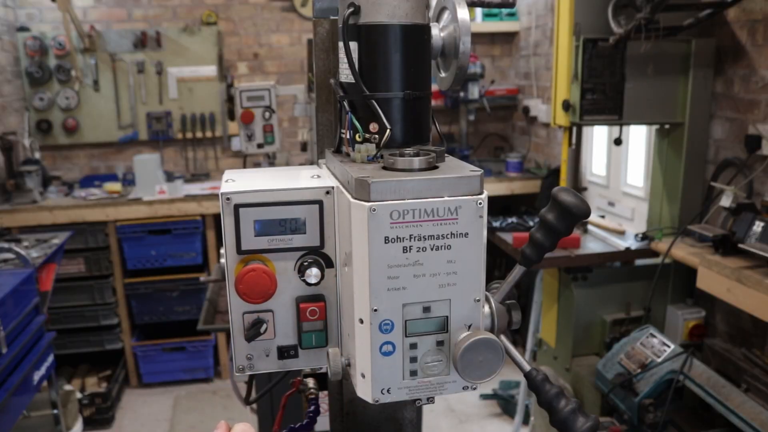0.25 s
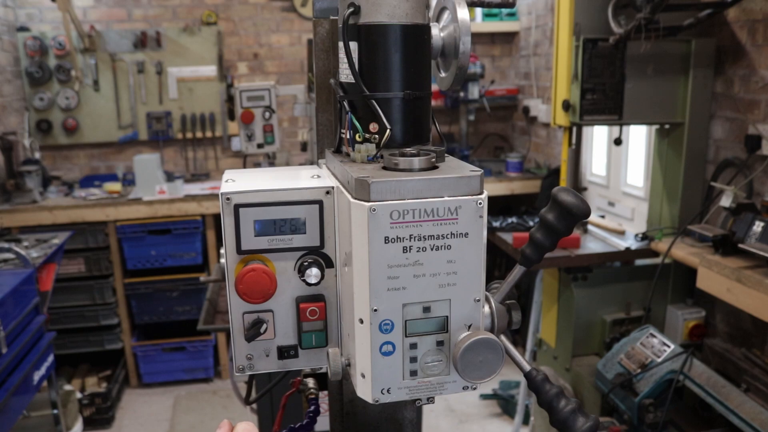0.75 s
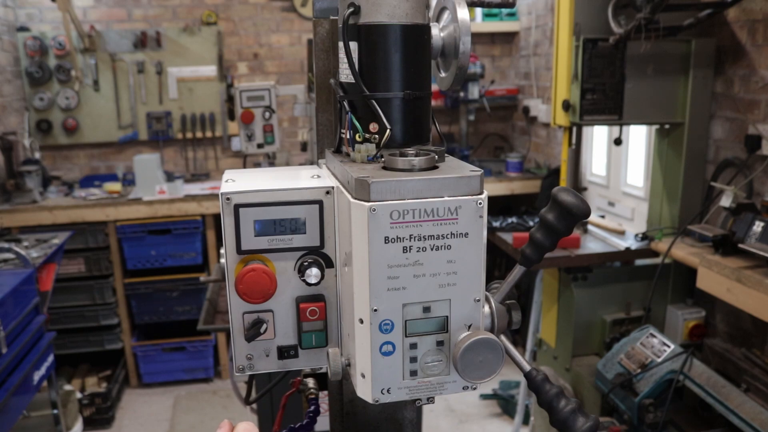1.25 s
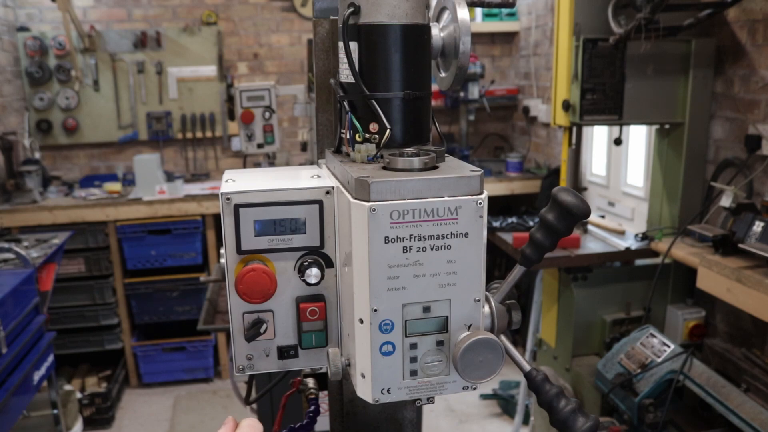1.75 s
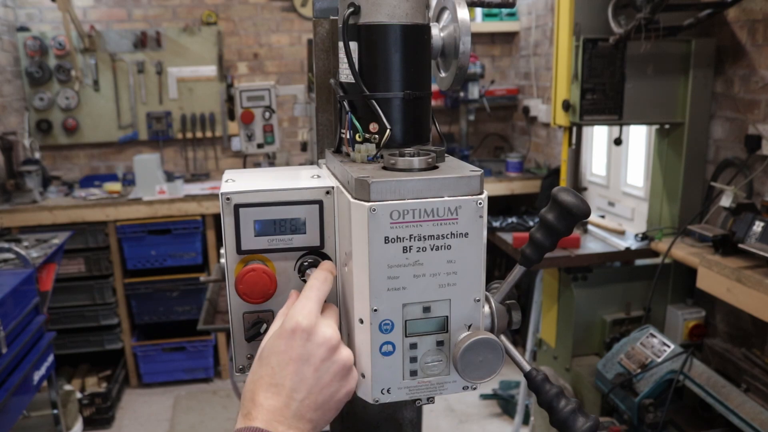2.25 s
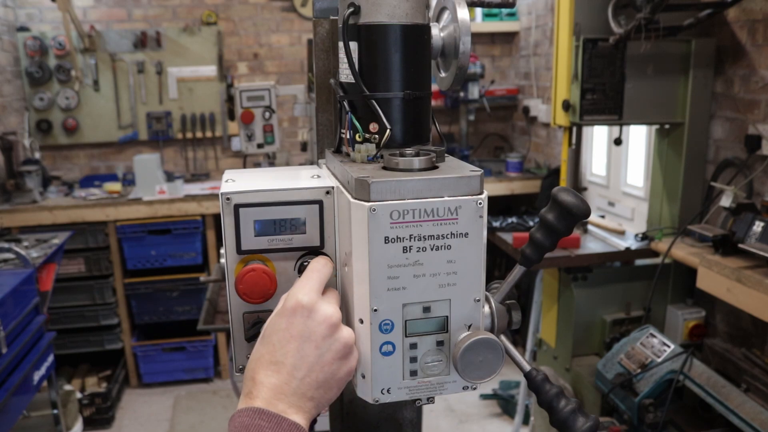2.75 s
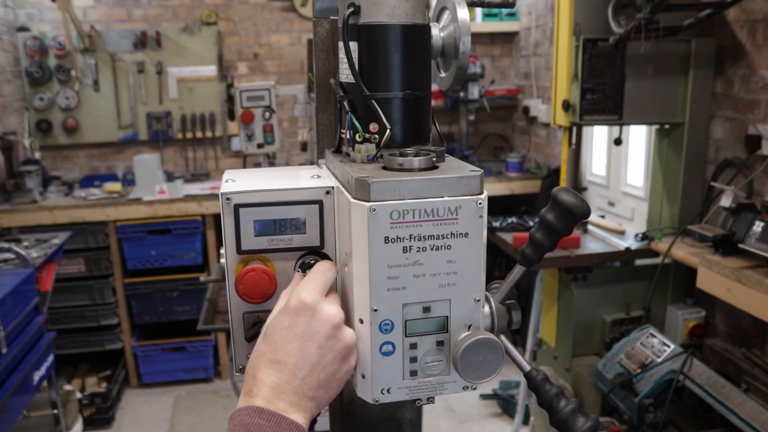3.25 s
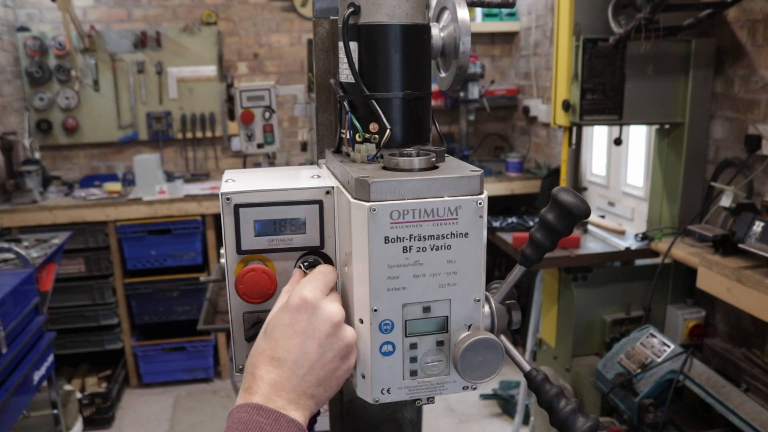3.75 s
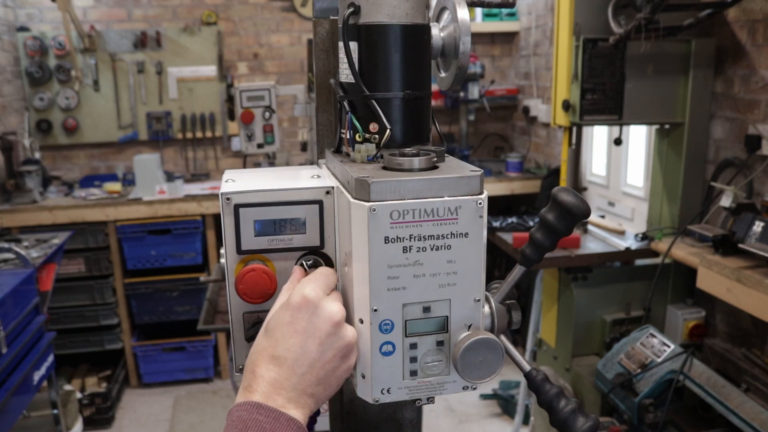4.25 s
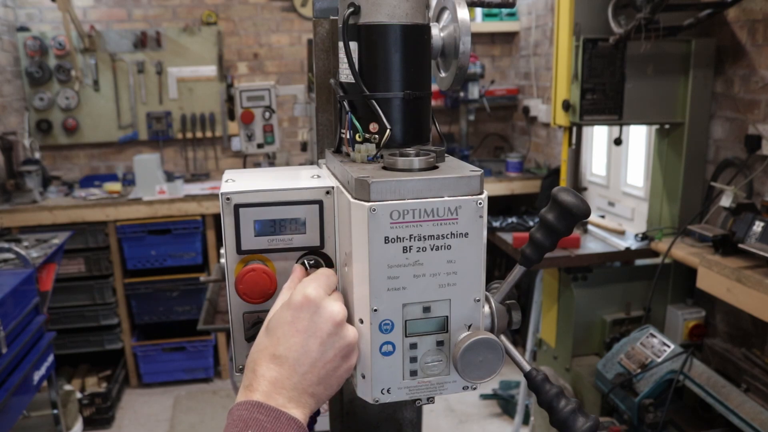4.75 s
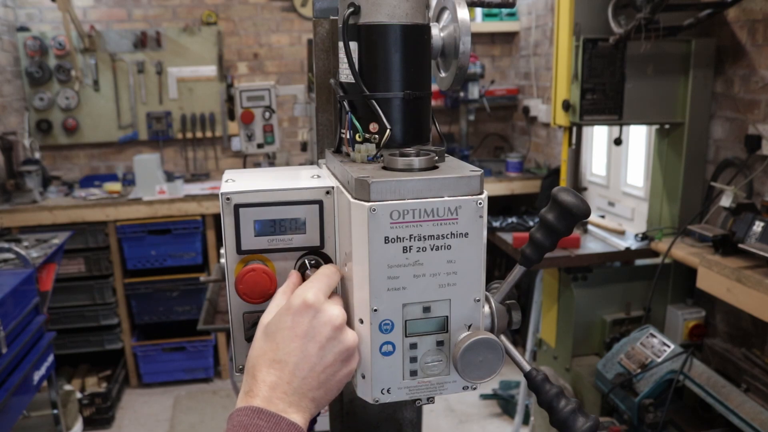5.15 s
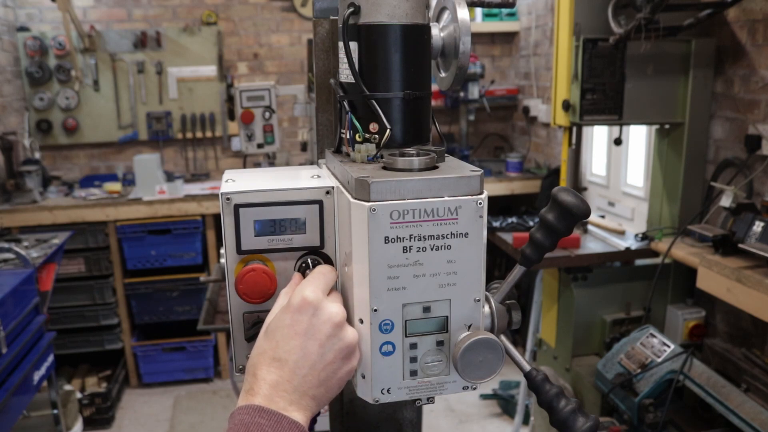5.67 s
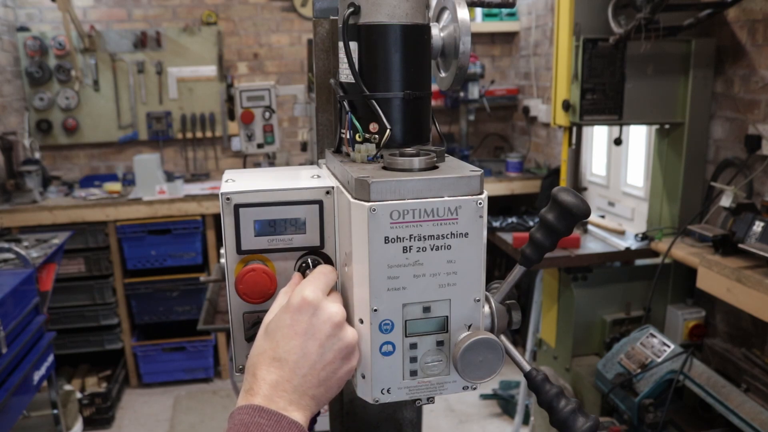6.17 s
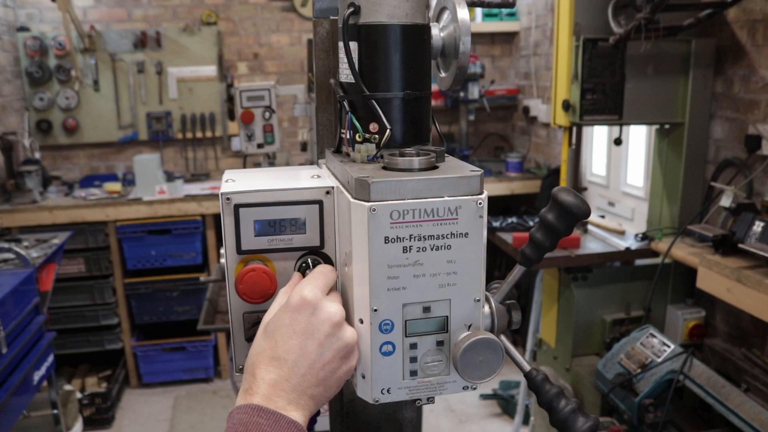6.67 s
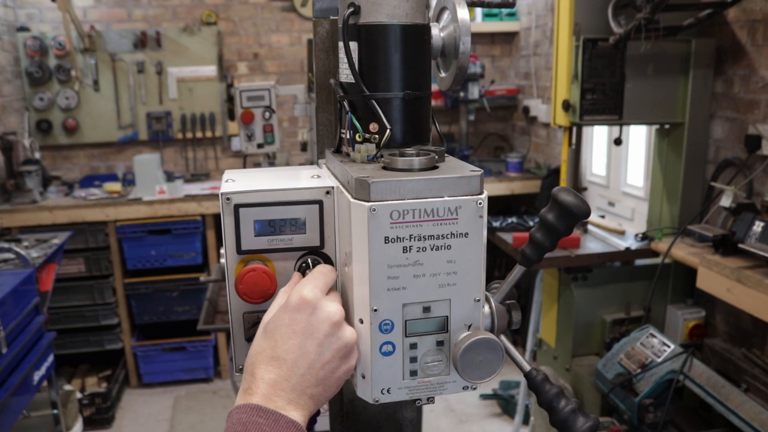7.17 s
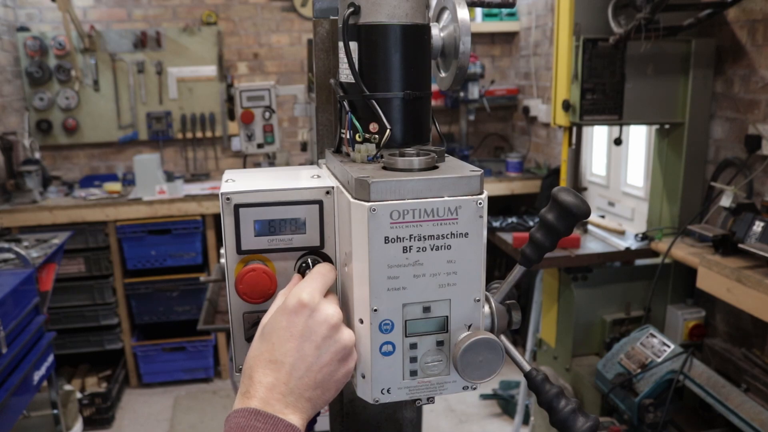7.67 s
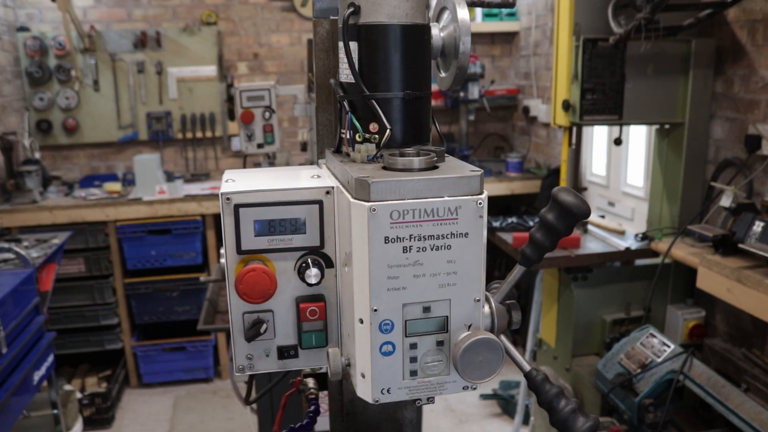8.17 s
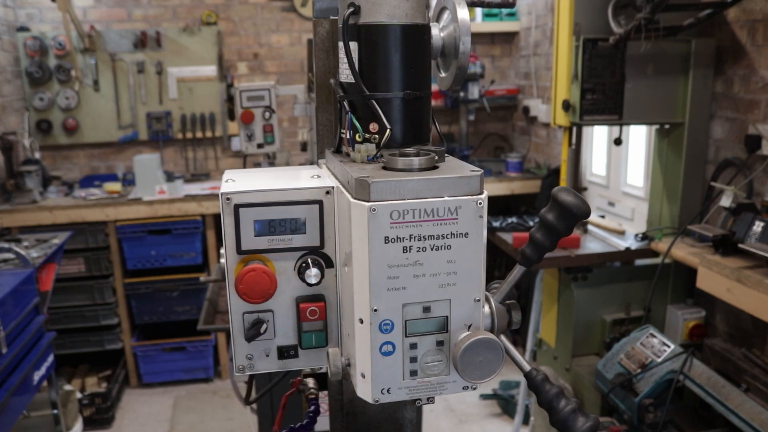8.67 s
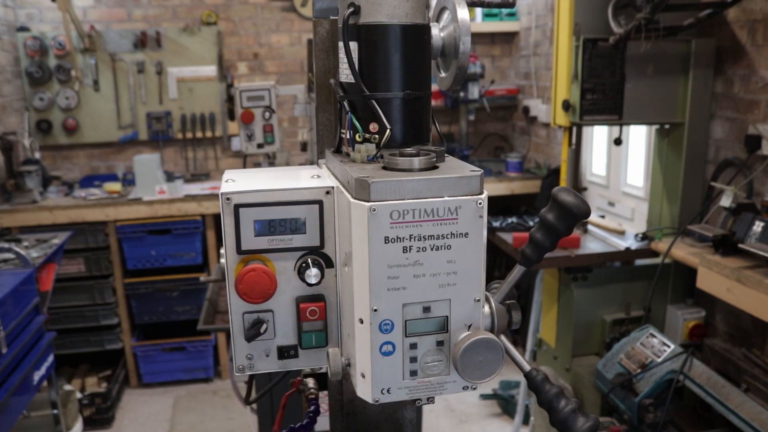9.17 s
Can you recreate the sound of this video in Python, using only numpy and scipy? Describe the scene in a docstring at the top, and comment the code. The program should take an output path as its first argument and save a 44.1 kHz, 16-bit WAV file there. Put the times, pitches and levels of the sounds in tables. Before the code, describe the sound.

A motor-driven gear head turns over slowly, its loose teeth clattering in lumpy, repeating pulses over a soft hum. The speed is raised gradually; the rattle gets much louder, faster and rougher, brushes hiss and buzz at the top, and a modest whine joins in. It settles into a constant harsh run to the end, cut off still running. Close, fairly dry microphone in a cluttered workshop.

```python
"""Loose gear teeth rattle in the cast head of an unloaded bench mill, as random blows that ring the casting.
The mill idles, a hand turns the speed knob up, and it holds at full speed while the teeth also whine.
The blows crowd on the supply ripple, and single knocks and a ringing control box panel stand out;
the hand damps that panel while it rests there. Two brushes tick and scrape over the commutator bars.
Behind them lie the echo of the workshop, wavering hums and a low rumble of filtered noise."""
import sys
import numpy as np
from scipy import signal
from scipy.fft import rfft, irfft
from scipy.io import wavfile
from scipy.ndimage import uniform_filter1d

SR = 44100
rng = np.random.default_rng(int(sys.argv[2]) if len(sys.argv) > 2 else 0)


def to_wav(sig):
    """Store sig (one row per channel, or 1-D mono) as 16-bit WAV at the path in sys.argv[1].

    Samples outside -1..1 are clipped; the rate is SR.
    """
    pcm = np.clip(np.atleast_2d(sig), -1, 1) * 32767
    pcm = np.round(pcm).astype(np.int16)
    wavfile.write(sys.argv[1], SR, pcm.T)  # frames by channels


N = 415422

RIPPLE_HZ = 99.9
FULL_TURNS = 43  # motor turns a second that count as full speed
START_TURN, LAY_RATIO = 0.24, 20 / 37  # motor place at the start in turns; layshaft turns for each motor turn


def amp(db):
    """Turns dB into a plain gain."""
    return 10 ** (np.asarray(db) / 20)


def evened(x):
    """Scales a sound to rms 1."""
    return x / np.sqrt(np.mean(x ** 2) + 1e-20)


def hold_level(x, span=0.2):
    """Holds the slow level near 1, judged over a span in seconds."""
    slow_power = abs(uniform_filter1d(x ** 2, round(span * SR)))
    return x / np.sqrt(slow_power + 1e-3 * np.mean(x ** 2))


def drift(hz):
    """Slow random wandering of rms 1; a higher hz wanders faster."""
    steps = rng.standard_normal(N // 64 + 2)
    step_hz = np.fft.rfftfreq(len(steps), 64 / SR)
    smooth = irfft(rfft(steps) * np.exp(-(step_hz / hz) ** 2), len(steps))
    return np.interp(np.arange(N) / 64, np.arange(len(steps)), evened(smooth))


def colour(x, broad, rings):
    """Filters by a broad spectrum plus resonant bumps, with no sound ahead of a blow; white noise keeps its power."""
    hz = abs(np.fft.fftfreq(8192, 1 / SR))
    points_hz, points_db = np.transpose(broad)
    db = np.interp(np.log(hz + 1), np.log(points_hz), points_db)
    for centre, width, height_db in rings:
        db = db + height_db / (1 + (2 * (hz - centre) / width) ** 2)
    log_gain = np.log(amp(np.maximum(db, -100)))
    # minimum phase: the response starts as promptly as this spectrum allows
    taps = np.fft.ifft(np.exp(log_gain - 1j * signal.hilbert(log_gain).imag)).real[:4096]
    return signal.oaconvolve(x, taps / np.linalg.norm(taps))[:N]


def ticks(places, sizes):
    """Smooth clicks that may fall between two samples, so that their timing is exact."""
    at = np.floor(places)[:, None] + np.arange(-15, 17)
    away = at - places[:, None]
    shape = np.sinc(away) * np.cos(np.pi * away / 34) ** 2
    slots = np.clip(at, 0, N).astype(int)
    return np.bincount(slots.ravel(), (shape * sizes[:, None]).ravel(), N + 1)[:N]


def grown(speed, law):
    """Gain that grows with the speed above a quiet creep."""
    full_db, tenfold_db, creep = law
    return amp(full_db + tenfold_db * np.log10(np.maximum(speed - creep, .3) / (FULL_TURNS - creep)))


# How fast the motor shaft spins.
# Each row: time in seconds, speed in turns a second before rounding off.
MOTOR_SPEED = [(0, 12.44), (0.4, 13.29), (0.8, 11.73), (1.5, 11.01), (2.8, 10.73), (3.43, 10.66),
               (3.85, 14.37), (4.8, 26.84), (5.25, 31.6), (5.7, 34.3), (6.2, 38.9), (6.7, 41.05),
               (7.4, 42.45), (8.1, 42.85), (9.42, 42.9)]


def motor_speed():
    """Speed of the motor shaft; the rotor's inertia rounds off each change."""
    speed = np.interp(np.arange(N) / SR, *np.transpose(MOTOR_SPEED))
    return uniform_filter1d(speed, SR // 5, mode="nearest")


# Uneven places round the layshaft wheel: proud teeth strike harder, low ones softer.
# Each row: place in turns, change of blow strength in dB at idle, the same at full speed, before each spot's weight.
UNEVEN_TEETH = [(0.98, 6, 5), (0.073, 7.5, -1), (0.168, 5.5, 1.5), (0.277, 7.5, 2.5), (0.448, -10.5, 3),
                (0.556, 6, 2.5), (0.755, -1, -1.5), (0.84, -18, 1)]
# Contact spots between the teeth; each favours one region of the head.
# Each row: ring in Hz, ring width in Hz, ring height in dB, spread of blow sizes in dB, share of smooth
# rolling noise (a plain factor), scatter time in seconds, weight of the uneven teeth (a plain factor),
# swell per spindle turn in dB (shrinks with speed), basic blows a second (speed, ripple and uneven teeth
# change it), crowding of blows on the ripple peaks in dB (below zero they thin out there),
# level in dB before the shared gains.
CONTACT_SPOTS = [(584, 120, 16, 2, 0.086, 0.026, 0.57, 13, 24, -0.5, -10.5),
                 (942, 1020, 10.5, 2, 0.56, 0.02, 0.4, 0.4, 300, 1, -0.5),
                 (2553, 1670, 13.5, 2, 0.14, 0.02207, 0.9, -1.8, 280, 4, 0.5),
                 (3700, 1080, 11.5, 1.2, 0.095, 0.02, 0.81, 1.5, 160, 8, -1.5),
                 (4855, 2000, 11, 4.5, 0.032, 0.01496, 0.94, 1.5, 130, 8, -1.5)]
# Broad sound colour of the head casting at idle. Each row: pitch in Hz, relative level in dB.
HEAD_SLOW = [(240, -20), (400, -54), (480, -8.5), (556, -20), (968, 2), (1360, -2), (1650, 3), (2620, 8),
             (2810, 5), (3440, 2), (6000, -11), (7800, -38), (13200, -120)]
# The same at full speed. Each row: pitch in Hz, relative level in dB.
HEAD_FAST = [(240, -34.5), (400, -32.5), (525, -10.5), (629, -16), (808, -13.5), (1340, -10), (2540, 1.5),
             (3150, -2), (3730, -3.5), (5180, -7), (6000, -15), (7800, -20), (13200, -120)]
# Narrow rings of the head. Each row: pitch in Hz, dB over the broad colour, before a small random change.
HEAD_RINGS = [(490, 7.5), (545, 5.5), (790, 8.5), (880, 3.5), (935, 1.5), (1270, 0.5), (1582, 1.5),
              (1690, 9), (1808, 8), (2024, 2.5), (2164, 3), (2304, 4.5), (2503, 7.5), (2571, 2.5),
              (2630, 2), (2700, 5.5), (2820, 9), (2906, 8), (2993, 2), (3445, 3.5), (3692, 6.5),
              (3875, 3.5), (4069, 5), (4382, 6.5), (5254, 6), (5469, 1)]
RING_WIDTH_HZ, RING_WIDENING = 47, 0.34  # width at 2500 Hz; higher rings are wider, as a power of their pitch
RATTLE_LAW = (-22, 17.93, 7.7)  # dB at full speed, dB per tenfold of speed above the creep, creep in turns a second


def gears(turns, speed, pace):
    """Teeth chatter through their backlash; torque ripple and uneven teeth change how hard and often they strike."""
    t = np.arange(N) / SR
    lay = (turns - START_TURN) * LAY_RATIO  # layshaft place in turns
    uneven_db = np.zeros(N)
    for place, idle_db, full_db in UNEVEN_TEETH:
        turns_away = (lay - place + .5) % 1 - .5
        near = np.exp(-(turns_away / (0.018 + 0.032 * pace)) ** 2)
        uneven_db += (idle_db + (full_db - idle_db) * pace) * near
    ripple = np.cos(2 * np.pi * (RIPPLE_HZ * t - .83))
    ripple_db = (0.5 + 0.59 * pace) * ripple
    # the spindle turns once for two layshaft turns
    spindle = (1 - 0.24 * pace) * np.cos(2 * np.pi * (lay / 2 - .62))

    level = grown(speed, RATTLE_LAW)
    fast_share = np.clip(2.6 * pace, 0, 1)  # crossfade from the idle colour to the full-speed colour
    whine = mesh_whine(lay, level * fast_share)
    knock_blows, knock_rings = knocks()
    out = np.zeros(N)
    for k, spot in enumerate(CONTACT_SPOTS):
        hz, width, height_db, spread_db, smooth, scatter_s, weight, swell_db, rate, crowd_db, level_db = spot
        rings = [(f, RING_WIDTH_HZ * (f / 2500) ** RING_WIDENING, db + 0.49 * rng.standard_normal())
                 for f, db in HEAD_RINGS]
        rings.append((hz, width, height_db))
        sizes = amp(spread_db * np.minimum(rng.exponential(1, N), 3))
        crowding = amp(0.7 * weight * uneven_db + crowd_db * (ripple - .4))
        blows_a_second = crowding * rate * (1 + 3.5 * pace ** 3)
        blows = sizes * (rng.random(N) < blows_a_second / SR)
        hard_db = weight * uneven_db + ripple_db + swell_db * spindle + 0.63 * drift(7.4)
        rattle = hold_level(amp(hard_db) * rng.choice([-1., 1.], N) * blows, span=0.19)
        hit = level * (0.52 * rattle + smooth * rng.standard_normal(N))
        if k > 1:  # single knocks reach the three later spots, the third row most
            hit += amp(9.5) * knock_blows * (1.57 if k == 2 else 1)
        hit = amp(level_db) * scattered(hit, scatter_s)
        out += colour(hit * (1 - fast_share), HEAD_SLOW, rings)
        out += colour(hit * fast_share, HEAD_FAST, rings)
    out += whine
    return amp(-2.0) * (out + panel(out)) + knock_rings


def scattered(x, scatter_s):
    """Many paths through the casting spread a blow in time: each pitch has its own delay, uncoloured."""
    delay_s = scatter_s / 12 * np.minimum(rng.exponential(1, 129), 4)
    # summing the delay over pitch gives the phase, in turns
    phase_turns = np.cumsum(np.interp(np.arange(2049) / 16, np.arange(129), delay_s)) * SR / 4096
    return signal.oaconvolve(x, irfft(np.exp(-2j * np.pi * phase_turns))[:1024])[:N]


# Whine of the meshing teeth.
# Each row: cycles per layshaft turn, relative level in dB, growth as a power of the speed (besides the rattle's).
MESH_TONES = [(37, -29, 20), (38, -23, 22), (42, -23, -1), (55, -21, 12)]


def mesh_whine(lay, gain):
    """Meshing teeth push the head at whole multiples of the layshaft turn, and one head ring answers."""
    share = np.gradient(lay) / np.gradient(lay).max()  # share of the top speed
    whine = np.zeros(N)
    for multiple, db, power in MESH_TONES:
        wavering = amp(db + 2 * drift(12))
        whine += share ** power * wavering * np.sin(2 * np.pi * multiple * lay + .4 * drift(20))
    broad = [(400, -30), (560, -4), (690, -9), (850, 0), (2500, -12)]  # Hz, dB
    return amp(-11) * colour(gain * whine, broad, [(885, 110, 8)])  # ring: Hz, width in Hz, dB


# Loudest single knocks.
# Each row: start in seconds, level in dB before the gains of blow and ring, ring pitch in Hz.
LOUD_KNOCKS = [(0.0825, -32, 3500), (0.16, -28, 2620), (0.188, -23, 3600), (0.226, -30, 3570),
               (0.3691, -26, 3900), (0.4283, -37, 3770), (0.5091, -22.5, 3850), (0.718, -23, 3470),
               (0.877, -29, 4160), (1.1983, -30, 3580), (1.529, -25, 3380), (1.63, -44, 3730),
               (1.797, -31, 3720), (1.9672, -27, 3470), (1.999, -42, 3580), (2.1385, -26.5, 3800),
               (2.3097, -27, 3640), (2.5492, -29.5, 3900), (3.0686, -33, 3540), (3.1682, -27, 3980),
               (3.239, -29, 3700), (3.625, -32, 3560), (3.726, -40, 3700), (3.8109, -26, 4020),
               (3.861, -21.5, 3660), (3.982, -21, 3680), (4.0907, -19.5, 3570), (4.151, -24, 4000),
               (4.2416, -30, 4570), (4.341, -21, 4030), (4.382, -35, 3850), (4.4615, -21, 3580),
               (4.582, -20, 4280), (4.7636, -25, 3650), (4.8324, -33, 3600), (4.9914, -24, 3420),
               (5.03, -19, 3800), (5.0614, -18.5, 4100), (5.0927, -16, 3960), (5.3304, -17, 3640),
               (5.7335, -14, 3930), (5.901, -24, 3970), (6.4633, -17, 4130), (6.6847, -17, 3620),
               (7.7042, -15.5, 3620), (7.907, -30, 3600), (7.9152, -14, 3600), (8.1333, -23, 3700),
               (9.1237, -18, 3600)]
BOUNCE_DB, KNOCK_RING_DB, KNOCK_T60_S = -5.5, -5.5, 0.019  # the ring falls by 60 dB in its T60


def knocks():
    """A knocked tooth lands again one ripple later; gives the blows into the head and the short ring of each."""
    at, db, hz = np.transpose(LOUD_KNOCKS)
    blows, ring, t = np.zeros(N), np.zeros(N + 2048), np.arange(2048) / SR
    luck = rng.standard_normal((len(at), 2))
    for k, fall_db in enumerate((0, BOUNCE_DB)):
        size_db = db + fall_db + 1.9 * luck[:, k] * (k > 0)  # only bounces vary by chance
        starts = at + k / RIPPLE_HZ
        blows += ticks(starts * SR, amp(size_db))
        for start, one_db, pitch in zip(starts, size_db, hz):
            decay = amp(one_db + KNOCK_RING_DB - 60 * t / KNOCK_T60_S)
            tone = np.minimum(t / .0008, 1) * decay * np.sin(2 * np.pi * pitch * t)
            part = ring[round(start * SR):][:len(t)]
            part += tone[:len(part)]
    high_pass = signal.butter(2, 1500, "high", fs=SR, output="sos")
    return signal.sosfilt(high_pass, blows), ring[:N]


# The ring of the control box panel.
# One row: pitch in Hz, width in Hz, level in dB before its changing freedom to ring.
PANEL_RING = (2390, 156, -8.5)
HAND_ON_S, HAND_OFF_S, HAND_MOVE_S = 2.3, 7.895, 0.067  # the hand rests on the control box between these times
PANEL_FREE, PANEL_HELD = 2.8, 0.066  # how freely the panel rings, as a gain
LET_GO, SETTLE_S = 3.3, 0.14  # extra gain just after letting go, and how fast it fades


def panel(x):
    """The panel answers the head at one pitch: damped under the hand, lively just after it lets go."""
    t = np.arange(N) / SR
    hz, width, db = PANEL_RING
    held = uniform_filter1d(1. * (t > HAND_ON_S) * (t < HAND_OFF_S), round(HAND_MOVE_S * SR))
    lively = LET_GO * (t > HAND_OFF_S) * np.exp(-np.maximum(t - HAND_OFF_S, 0) / SETTLE_S)
    freedom = PANEL_HELD * held + (PANEL_FREE + lively) * (1 - held)
    return amp(db) * freedom * signal.lfilter(*signal.iirpeak(hz, hz / width, SR), x)


# Broad sound colour of the brush holders. Each row: pitch in Hz, relative level in dB.
BRUSH_COLOUR = [(3060, -52), (5200, 3), (5860, -6), (6870, -6.5), (7390, -9), (7990, 0), (9590, -6.5),
                (10400, -2.5), (15500, -6.5)]
# Rings of the brush holders. Each row: pitch in Hz, width in Hz, dB over the broad colour.
BRUSH_RINGS = [(6100, 440, 9), (6725, 510, 12), (8115, 64, 8.5), (8840, 280, 6.5), (9110, 180, 8),
               (9840, 280, 7), (10390, 820, 6.5), (11340, 220, 6.5), (12600, 560, 6), (14000, 150, 7)]
BARS = 32  # commutator bars
BRUSH_LAW = (-39.5, 17.36, 6.07)  # dB at full speed, dB per tenfold of speed above the creep, creep in turns a second


def brushes(turns, speed, pace):
    """Each bar edge ticks under both brushes; the ticks swell once a turn, less so at speed."""
    count = np.arange(np.ceil(turns[0] * BARS), turns[-1] * BARS - 1)
    share = np.interp(count / BARS, turns, speed / FULL_TURNS)
    shake = np.interp(share ** 8, (0, 1), (0.1, 0.4))  # ticks come early or late, in samples: slow, full speed
    height, offset = rng.standard_normal((BARS, 2)).T
    wobble = .04 * np.sin(2 * np.pi * count / BARS)  # the shaft hurries and lags once a turn
    out = np.zeros(N)
    # the far brush is duller and pushes the housing the opposite way
    for side, sign, swell_db, top_hz, db in ((0, 1, 10.5, 19000, 0), (.5, -1, 9.0, 9300, -1.5)):
        bar = (count + side * BARS).astype(int) % BARS
        places = np.interp((count + .009 * offset[bar] + wobble) / BARS, turns, np.arange(N))
        places += shake * rng.standard_normal(len(count))
        sizes = (1 + .13 * height[bar]) * (1 + .2 * rng.standard_normal(len(count)))
        edge = ticks(places, sizes)
        # the scrape is strongest just after each bar edge
        scrape = rng.standard_normal(N) * (1.4 + np.exp(-(turns * BARS % 1)))
        once_a_turn = np.cos(2 * np.pi * (turns + side + .03))
        lobe = (1 - .42 * pace ** 3) * (.5 + .5 * np.tanh(1.6 * (once_a_turn - .2)))
        ticking = hold_level(amp(swell_db * lobe + .8 * drift(30)) * edge)
        both = hold_level(ticking + 1.02 * evened(amp(6.8 * lobe) * scrape))
        low_pass = signal.butter(4, top_hz, fs=SR, output="sos")
        out += sign * amp(db) * signal.sosfilt(low_pass, both)
    return grown(speed, BRUSH_LAW) * colour(out, BRUSH_COLOUR, BRUSH_RINGS)


def room(x, t60=0.57):
    """Echoes of random sign, one in every 20 samples, die away; cluttered walls swallow the treble."""
    taps = np.zeros(SR // 2)
    at = np.arange(200, SR // 2 - 20, 20) + rng.integers(0, 20, (SR // 2 - 201) // 20)
    taps[at] = rng.choice([-1., 1.], len(at)) * amp(-60 * at / SR / t60)
    taps = signal.lfilter(*signal.butter(2, 6000, fs=SR), taps)
    return signal.oaconvolve(x, taps / np.linalg.norm(taps))[:N]


# Broad sound colour of the low rumble. Each row: pitch in Hz, relative level in dB.
RUMBLE_COLOUR = [(15, -64), (25, -35), (48, -9.5), (72, 4.5), (92, -25), (116, -6.5), (190, -4), (296, -10),
                 (389, -11), (480, -4), (620, -3), (1060, -120)]
# Faint tones. Each row: middle pitch in Hz, middle level in dB (both waver).
FAINT_TONES = [(68, -75.5), (289, -74), (1000.7, -57)]
# each pair: at idle, at full speed
RUMBLE_DB, HUM_DB, SAG_DB = (-65, -61.5), (-65, -61.5), (-70, -61.5)
SAG_HZ = (144, 139.6)  # a second hum sags as the motor speeds up


def hums(speed):
    """Supply hum, the sagging hum and faint tones, all wavering, over a low rumble of noise."""
    t, idle = np.arange(N) / SR, speed.min()

    def between(ends):
        """Slides from the idle value to the full-speed value."""
        return np.interp(speed, (idle, FULL_TURNS), ends)

    def tone(cycles, db, waver_db):
        """A sine whose loudness and phase wander; db is its middle rms level."""
        level = np.sqrt(2) * amp(db + waver_db * drift(11))
        return level * np.sin(2 * np.pi * cycles + 1.05 * drift(1.7))

    out = tone(RIPPLE_HZ * t, between(HUM_DB), 1.2)
    out += tone(np.cumsum(between(SAG_HZ)) / SR, between(SAG_DB), 0.54)
    for hz, db in FAINT_TONES:
        out += tone(hz * t, db, 1.5)
    return out + amp(between(RUMBLE_DB)) * colour(rng.standard_normal(N), RUMBLE_COLOUR, [])


def scene():
    """The machine, its echo in the workshop and the hums."""
    speed = motor_speed()
    turns = START_TURN + np.cumsum(speed) / SR
    pace = np.clip((speed - 11.5) / 24, 0, 1)  # 0 at idle, 1 when fast
    machine = gears(turns, speed, pace) + brushes(turns, speed, pace)
    return (machine + amp(-13.5) * room(machine) + hums(speed))[None]


def record(dry):
    """Removes everything above about 15.7 kHz with a steep filter."""
    taps = signal.firwin(1023, 15700, window=("kaiser", 10), fs=SR)
    return signal.oaconvolve(dry, taps[None], "same")


dry = scene()
out = record(dry)
to_wav(out)
```